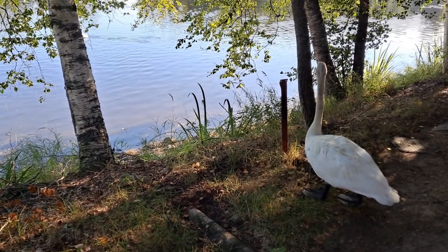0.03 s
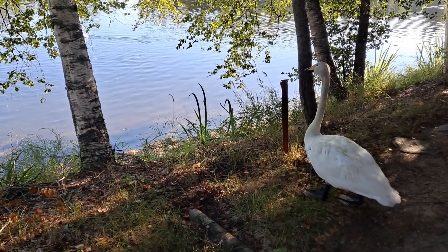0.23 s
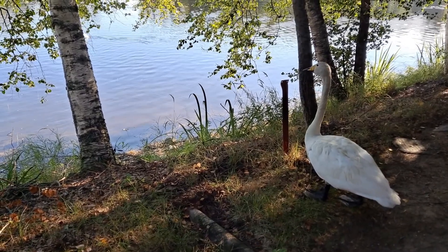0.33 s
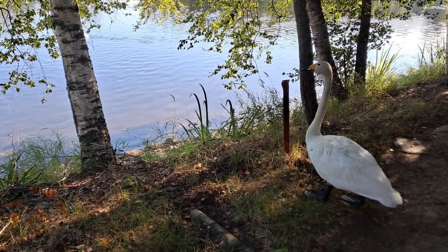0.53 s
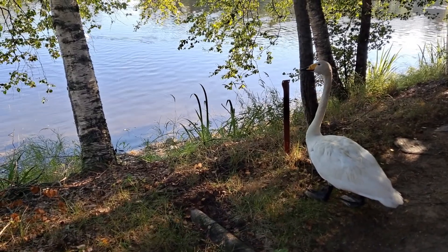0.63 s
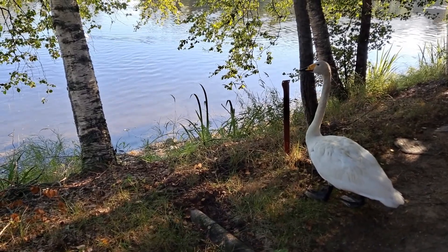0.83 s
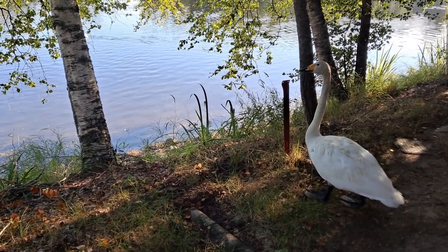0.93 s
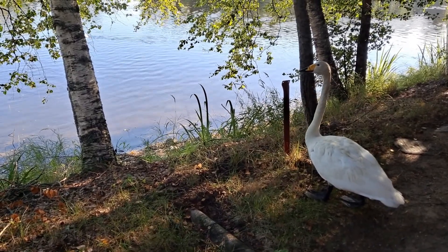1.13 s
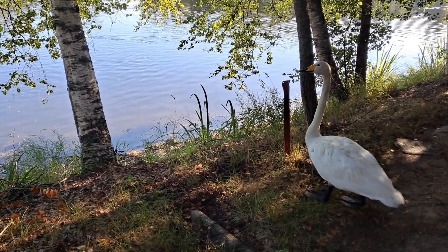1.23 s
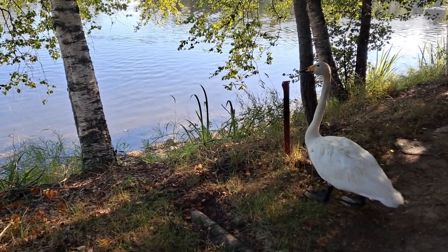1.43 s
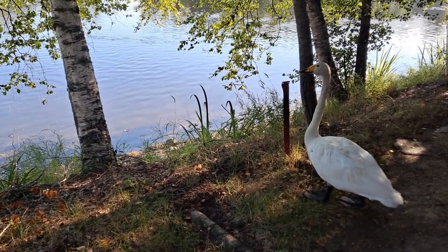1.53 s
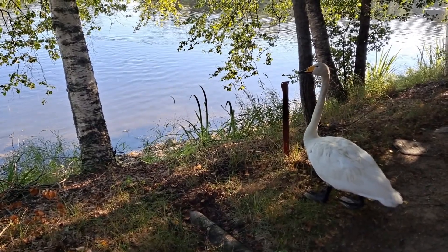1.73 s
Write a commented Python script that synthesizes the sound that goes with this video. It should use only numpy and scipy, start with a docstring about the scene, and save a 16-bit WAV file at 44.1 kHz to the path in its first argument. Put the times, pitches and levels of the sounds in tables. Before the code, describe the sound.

A swan gives one short, loud honk at about 0.2 seconds, close and slightly to the left. It starts low and reedy, cracks through a breathy rasp into a higher ringing note, and sags away by 0.4 seconds. A light echo fades across the wooded lake shore. A faint low rumble and distant engine drone continue throughout, with barely audible far-off calls from about 1.2 to 1.8 seconds.

```python
"""A wooded lake shore, a swan a little left of a stereo microphone. It gives one short honk: a low
reedy note cracks, through a rasp, up a fourth into a loud ringing note that sags into a soft afterswell.
Air hisses through its bill and rings its long windpipe. The trees scatter the call and it lingers faintly
over the water. Far off, an engine drones under the quiet air, with a few faint calls."""
import sys
import numpy as np
from scipy import signal
from scipy.fft import rfft, irfft
from scipy.io import wavfile

SR = 44100
rng = np.random.default_rng(int(sys.argv[2]) if len(sys.argv) > 2 else 0)


def log_audio(samples):
    """Write samples as a 16-bit WAV file to the path given in sys.argv[1]."""
    # one column per channel
    frames = np.atleast_2d(samples).T
    # limit to full scale, then quantise
    limited = np.clip(frames, -1, 1)
    pcm = np.round(limited * 32767).astype(np.int16)
    wavfile.write(sys.argv[1], SR, pcm)


N = 79380
T = np.arange(N) / SR
HZ = np.fft.rfftfreq(2 * N, 1 / SR)
TOP_HZ = 15950


# The swan's two notes. Each row: time in seconds, pitch in Hz, level in dB, overtone gain in dB.
LOW_NOTE = [(.193, 605.7, -60.5, -16), (.204, 596.6, -28.5, -12.5), (.212, 569.6, -29.5, 5.5),
            (.228, 583.3, -22, -0.5), (.252, 587, -24.5, 2), (.276, 592.3, -20, -5.5), (.286, 604, -29, -7),
            (.298, 570, -58, -8)]
HIGH_NOTE = [(.255, 770, -45, -18), (.268, 769.6, -19.5, -18), (.278, 776, -17, -18),
             (.285, 788.3, -12, -13.5), (.297, 781, -9.5, -1.5), (.312, 768, -14.5, 5),
             (.326, 747.2, -21.5, 4.5), (.337, 706.6, -26.5, -6), (.35, 736, -28, -14.5),
             (.364, 698.4, -45, -16), (.386, 759, -37, -20), (.396, 759.3, -41, -26), (.406, 740, -58, -22)]
# Their harmonics. Each row: frequency in Hz, relative strength in dB.
LOW_HARMONICS = [(585, 0), (1170, -0.5), (1750, -13), (2340, -12), (2920, -10.5), (3500, -20.5),
                 (4100, -18.5), (5250, -26.5), (5800, -44.5), (6950, -31.5), (7560, -22.5), (8200, -40),
                 (9400, -36.5), (15000, -38.5)]
HIGH_HARMONICS = [(775, -0.5), (1550, -19), (2330, -16.5), (3090, -14), (3870, -21.5), (4700, -29.5),
                  (6200, -37), (8500, -34.5), (9500, -48), (11600, -41.5), (15000, -40.5)]

def swan():
    """The voice breaks from low to high register; each vibration of the louder one chops the breath."""
    low, low_phase = register(LOW_NOTE, LOW_HARMONICS, jitter=.01)
    high, high_phase = register(HIGH_NOTE, HIGH_HARMONICS, jitter=.004)
    high_leads = swell(HIGH_NOTE, column=2) > swell(LOW_NOTE, column=2)
    puffs = 1 + .78 * np.cos(np.where(high_leads, high_phase, low_phase))
    return low + high + rasp(puffs) + bill_hiss(puffs) + croak() + windpipe()


def register(note, harmonics, jitter):
    """One note on an unsteady pitch, and its phase. Overtones enter low to high and waver separately."""
    phase = unsteady_phase(curve(note), jitter, drift_hz=300)
    centre_hz = np.median(np.transpose(note)[1])
    offsets = rng.uniform(0, np.pi, size=40)
    flutter_db = 2.86 * wander(hz=24.72)
    overtones = np.zeros(N)
    for k in range(2, int(TOP_HZ / centre_hz)):
        hz = k * centre_hz
        onset_s = .189 + .014 * np.tanh(hz / 3500)
        fade_in = np.sin(np.pi / 2 * np.clip((T - onset_s) / .02, 0, 1)) ** 4
        waver_db = np.roll(flutter_db, k * SR // 20) * (k > 2)
        gain = amp(read(harmonics, hz) + waver_db) * fade_in
        overtones += gain * np.cos(k * phase + offsets[k] * (k > 2))
    brightness = amp(curve(note, column=3))
    return -np.sqrt(2) * swell(note, column=2) * (np.cos(phase) + brightness * overtones), phase


# The rasp, strongest at the break. Each row: time in seconds, level in dB.
RASP_LEVEL = [(.19, -65.5), (.203, -44.5), (.22, -46), (.25, -33.5), (.272, -26.5), (.288, -26),
              (.305, -34), (.325, -43.5), (.35, -64.5)]
# Throat colour of rasp and croak. Each row: frequency in Hz, relative gain in dB.
THROAT_TONE = [(200, -56), (330, -38.5), (440, -12), (520, -11), (640, 4.5), (740, 5), (880, -13.5),
               (1050, 2), (1330, -13.5), (1650, -13.5), (1980, -4.5), (2400, -7), (2850, -4.5),
               (3700, -11.5), (5000, -24), (8000, -44.5)]

def rasp(puffs):
    """Puffs of air noise, coloured by the throat."""
    return swell(RASP_LEVEL) * noise(THROAT_TONE, puffs)


# The croak at the break. Each row: time in seconds, level in dB.
CROAK_LEVEL = [(.25, -50), (.268, -28.5), (.284, -23.5), (.296, -37.5), (.32, -56)]

def croak():
    """The two registers fight in a slow beat; both notes lie near multiples of it."""
    beat = unsteady_phase(hz=197.7, jitter=.032, drift_hz=300)
    pulses = sum(np.cos(k * beat + rng.uniform(0, np.pi)) for k in range(5, 26))
    return swell(CROAK_LEVEL) * unit(shape(pulses, amp(read(THROAT_TONE, HZ))))


# Breath at the bill. Each row: time in seconds, level in dB.
HISS_LEVEL = [(.205, -78.5), (.22, -53), (.255, -45), (.28, -36.5), (.297, -31), (.32, -46), (.335, -63.5),
              (.36, -78.5)]
# Its colour. Each row: frequency in Hz, relative gain in dB.
HISS_TONE = [(1500, -24.5), (3500, 2.5), (5200, -3), (7200, -1), (8700, -7), (10000, -16), (15500, -18.5)]

def bill_hiss(puffs):
    """Air hisses through the bill, pulsing with the voice."""
    return swell(HISS_LEVEL) * noise(HISS_TONE, puffs)


# The windpipe's ring. Each row: time in seconds, level in dB.
PIPE_LEVEL = [(.193, -55.5), (.204, -35.5), (.215, -39.5), (.245, -35.5), (.275, -26), (.3, -40),
              (.33, -42.5), (.35, -71.5)]
# Its resonances. Each row: frequency in Hz, width in Hz, relative gain in dB.
PIPE_RESONANCES = [(693.8, 110, -0.5), (1026, 38, -7), (1860, 46, -16.5)]

def windpipe():
    """Turbulence rings the narrow resonances of the long windpipe."""
    rings = sum(amp(db) / (1 + (2 * (HZ - hz) / width) ** 2) for hz, width, db in PIPE_RESONANCES)
    return swell(PIPE_LEVEL) * unit(shape(rng.standard_normal(N), rings))


# The direct call at the microphone. Each row: frequency in Hz, left minus right in dB.
MIC_BALANCE = [(550, 2.5), (780, 4.5), (1200, 5.5), (1550, 0), (2350, 3.5), (3100, 3), (3900, 5.5),
               (8000, 2.5), (14000, -6.5)]
# Early scatter off ground and trunks. Each row: frequency in Hz, relative gain in dB.
TRUNKS_TONE = [(600, -12.5), (1500, -6), (3000, 3), (8000, 3), (15000, 4)]
# The surrounding woods. Each row: frequency in Hz, reverberation level in dB, T60 in seconds.
WOODS_REVERB = [(300, -27, 0.36), (580, -20.5, 0.43), (778.7, -28.5, .42), (1200, -29.5, .35),
                (1500, -18.5, 0.32), (2300, -15.5, 0.33), (2700, -19, .33), (2988, -12, 0.44),
                (3451, -17.5, .33), (3850, -7.5, 0.4), (4200, -18.5, 0.41), (7300, -8.5, .34),
                (14000, -16, 0.34)]

def shore(call):
    """The call reaches the left microphone first; trunks scatter it, woods and lake ring on."""
    direct = amp(np.outer([.5, -.5], read(MIC_BALANCE, HZ))) * np.array([delay(0), delay(.00011)])
    bounces = np.array([sum(rng.choice([-1, 1]) * delay(s) for s in rng.uniform(.0035, .035, size=12))
                        for _ in range(2)])
    trunks = amp(read(TRUNKS_TONE, HZ) - 12.5) * bounces / np.std(bounces)
    lake = tail(t60=lambda hz: np.full(len(hz), 1.3)) * amp(-45) / (1 + (HZ / 900) ** 2)  # faint, dull
    woods = tail(t60=lambda hz: read(WOODS_REVERB, hz, column=2)) * amp(read(WOODS_REVERB, HZ))
    return shape(call, direct + trunks + woods * delay(.012) + lake)


# Calls from far off. Each row: start in seconds, length in seconds, pitch in Hz, level in dB.
FAR_CALLS = [(1.187, .11, 772, -75.5), (1.258, 0.12, 650, -74), (1.288, 0.34, 885, -82.5),
             (1.347, 0.47, 772, -82)]

def far_calls():
    """Faint wavering hoots, perhaps echoes or birds out on the lake."""
    hoots = np.zeros(N)
    for start, length, hz, db in FAR_CALLS:
        arch = np.sin(np.pi * np.clip((T - start) / length, 0, 1))
        hoots += amp(db) * arch * unit(np.sin(unsteady_phase(hz, jitter=.012, drift_hz=40)))
    return hoots


# An engine in the distance. Each row: time in seconds, levels in dB at 1, 2 and 5 times the firing rate.
ENGINE_LEVELS = [(0, -44, -55, -65.5), (.25, -40, -55, -70), (.55, -47, -65, -75),
                 (.85, -47.5, -64.5, -76.5), (1.12, -52, -61, -83.5), (1.35, -53, -56, -71),
                 (1.8, -59, -55.5, -66.5)]

def engine(firing_hz=66.15, right_lag_s=.00039, pan_db=.67):
    """Three multiples of one firing rate fade separately, slightly louder and earlier on the left."""
    phase = unsteady_phase(firing_hz, jitter=.015, drift_hz=8)
    at_mics = np.array([phase, phase - 2 * np.pi * firing_hz * right_lag_s])
    drone = sum(amp(curve(ENGINE_LEVELS, column)) * np.cos(k * at_mics)
                for column, k in enumerate((1, 2, 5), start=1))
    return -np.sqrt(2) * drone * amp([[pan_db], [-pan_db]])


# Open air around the microphone. Each row: frequency in Hz, relative gain in dB.
AIR_TONE = [(20, -26), (45, -11.5), (70, 1), (110, 4.5), (180, -1), (270, -11), (400, -12.5), (650, -18),
            (1100, -28), (2500, -33), (6000, -41), (15500, -42.5)]
# Its slow rise and fall. Each row: time in seconds, level in dB.
AIR_LEVEL = [(0, -59.5), (.3, -58.5), (.7, -64.5), (1.05, -64.5), (1.4, -62.5), (1.8, -62.5)]
# Its stereo likeness. Each row: frequency in Hz, left-right correlation.
AIR_CORRELATION = [(60, 0.9), (150, .88), (300, .65), (800, 0), (2000, .1), (15000, 0.023)]

def air():
    """Low outdoor rumble with a trace of hiss, nearly mono in the bass."""
    left, independent = noise(AIR_TONE), noise(AIR_TONE)
    likeness = read(AIR_CORRELATION, HZ)
    right = shape(left, likeness) + shape(independent, np.sqrt(1 - likeness ** 2))
    return np.array([left, right]) * amp(curve(AIR_LEVEL))


def amp(db):
    """Decibels to gain."""
    return 10 ** (np.asarray(db) / 20)


def unit(x):
    """Scales to rms 1."""
    return x / np.sqrt(np.mean(x ** 2) + 1e-20)


def curve(table, column=1):
    """One column of a time table, at every sample."""
    columns = np.transpose(table)
    return np.interp(T, columns[0], columns[column])


def swell(table, column=1, fade_db_per_s=4000):
    """Gain from a dB column, fading to silence outside the table."""
    outside_s = np.maximum(np.maximum(table[0][0] - T, T - table[-1][0]), 0)
    return amp(np.maximum(curve(table, column) - fade_db_per_s * outside_s, -200))


def read(table, hz, column=1):
    """One column of a frequency table, on a log axis."""
    columns = np.transpose(table)
    return np.interp(np.log(hz + 1), np.log(columns[0]), columns[column])


def shape(x, gain):
    """Filters by a gain per frequency."""
    return irfft(rfft(x, 2 * N) * gain)[..., :N]


def noise(tone, puffs=1):
    """Noise, optionally chopped by puffs, then given a colour."""
    return unit(shape(puffs * rng.standard_normal(N), amp(read(tone, HZ))))


def wander(hz):
    """Random drift, mostly slower than hz."""
    return unit(shape(rng.standard_normal(N), 1 / (1 + (HZ / hz) ** 4)))


def unsteady_phase(hz, jitter, drift_hz):
    """Phase of a pitch that strays by the fraction jitter."""
    return 2 * np.pi * np.cumsum(hz * (1 + jitter * wander(drift_hz))) / SR


def delay(seconds):
    """Spectrum of a late arrival."""
    return np.exp(-2j * np.pi * HZ * seconds)


def tail(t60):
    """Spectrum of a diffuse stereo decay of energy 1; t60 gives seconds for each frequency."""
    hz, t, bands = signal.stft(rng.choice([-1., 1.], (2, N)), SR, nperseg=256)
    life_s = t60(hz)[:, None] / np.log(1000)
    decaying = bands * np.exp(-t / life_s) * np.sqrt(2 / life_s / SR)
    return rfft(signal.istft(decaying, SR, nperseg=256)[1][:, :N], 2 * N)


def scene():
    """The honk on the shore, over the distant background."""
    return shore(swan()) + far_calls() + engine() + air()


def record(dry):
    """The recorder's band limit."""
    lowpass = signal.firwin(511, TOP_HZ, window=("kaiser", 9), fs=SR)
    return signal.oaconvolve(dry, lowpass[None], "same")


dry = scene()
out = record(dry)
log_audio(out)
```